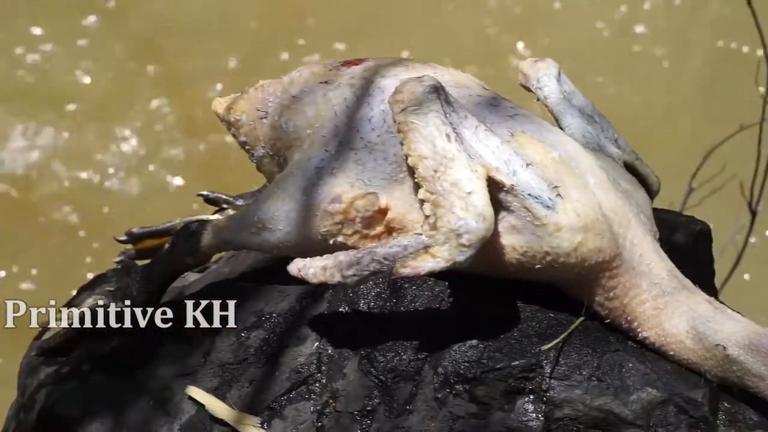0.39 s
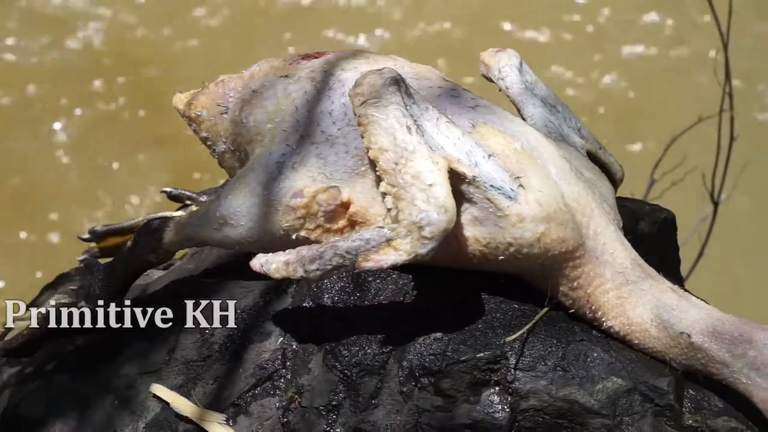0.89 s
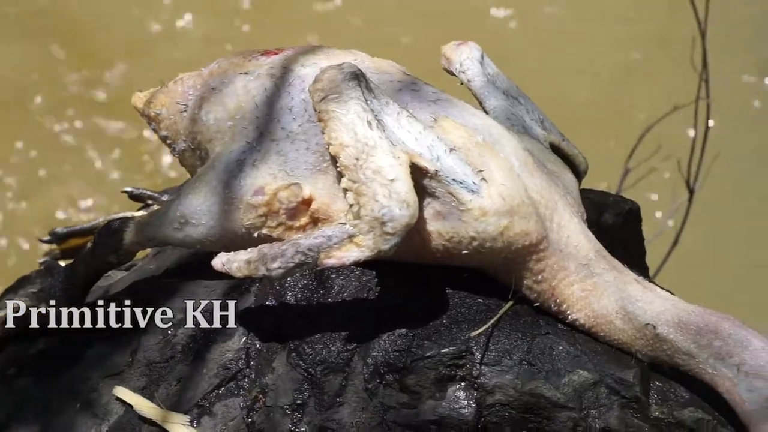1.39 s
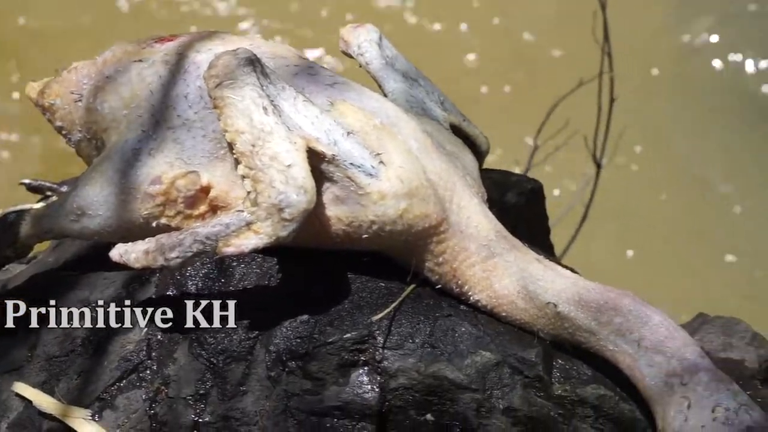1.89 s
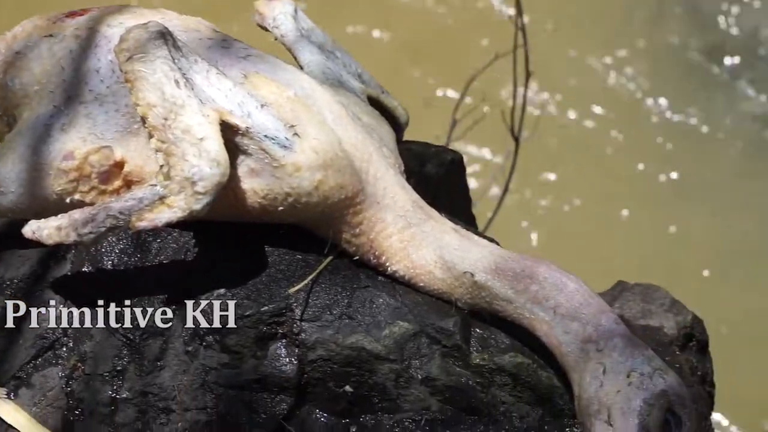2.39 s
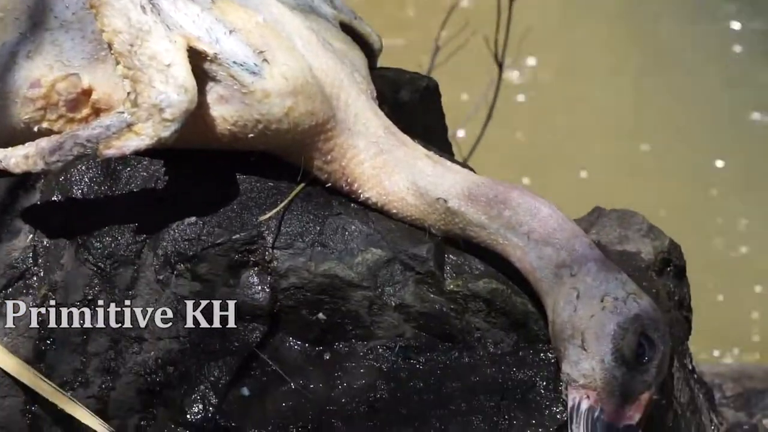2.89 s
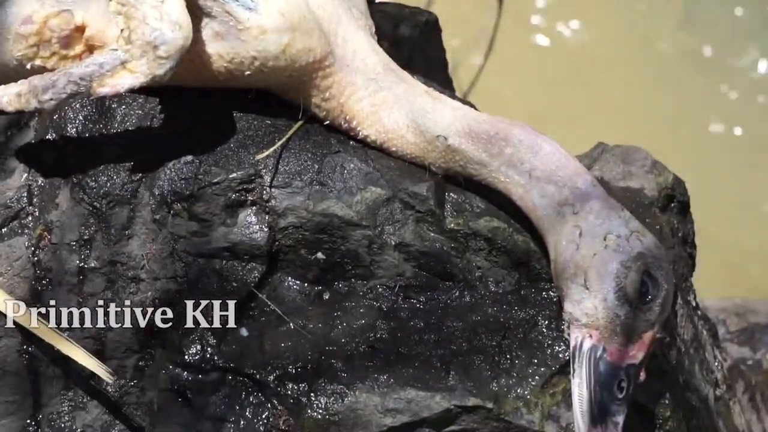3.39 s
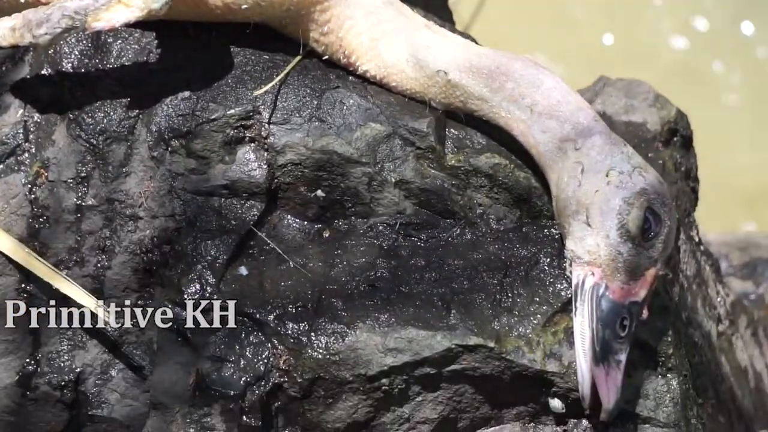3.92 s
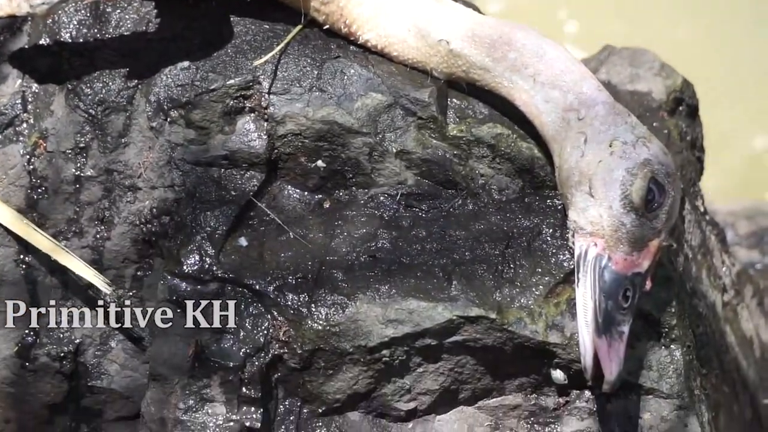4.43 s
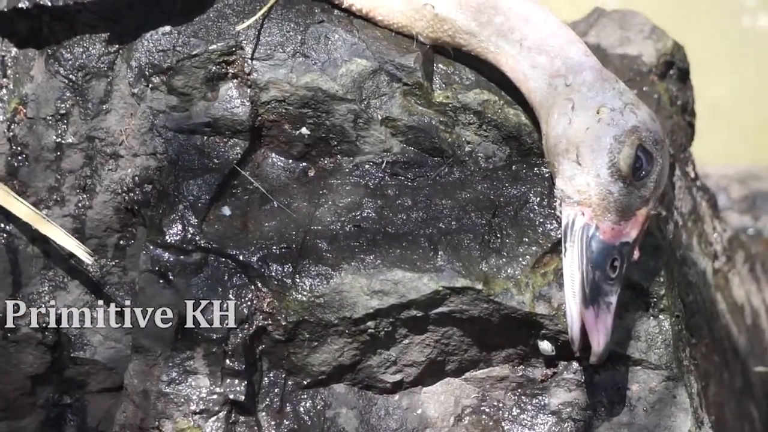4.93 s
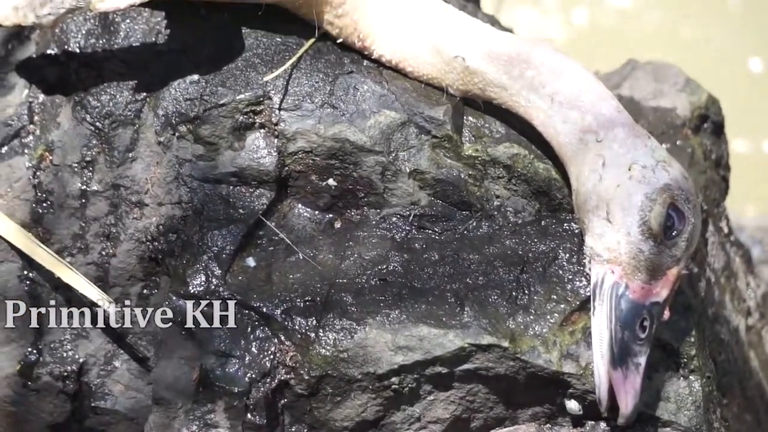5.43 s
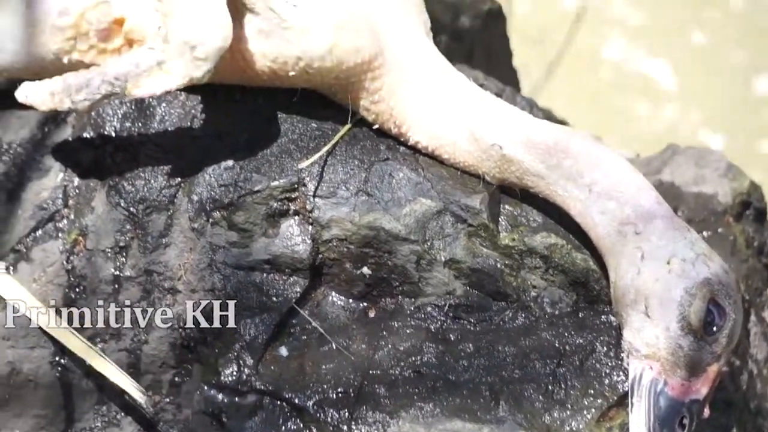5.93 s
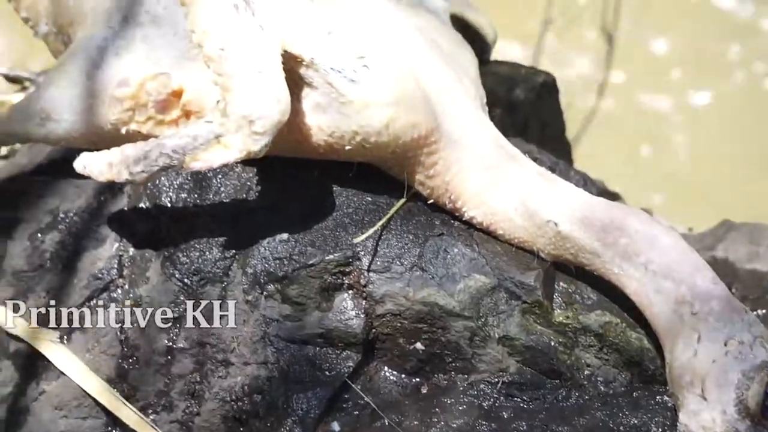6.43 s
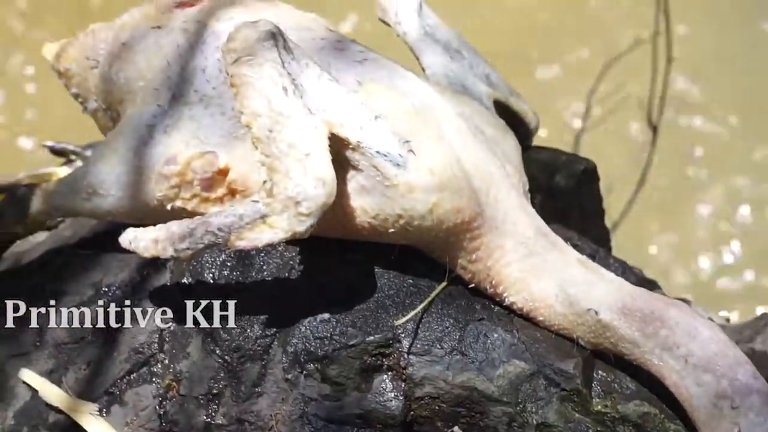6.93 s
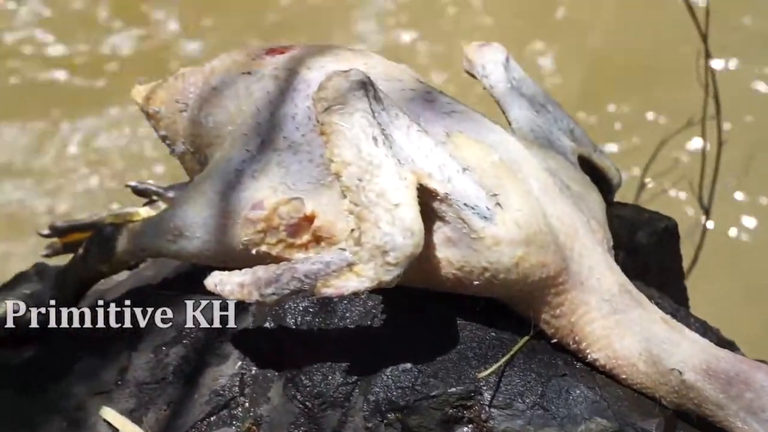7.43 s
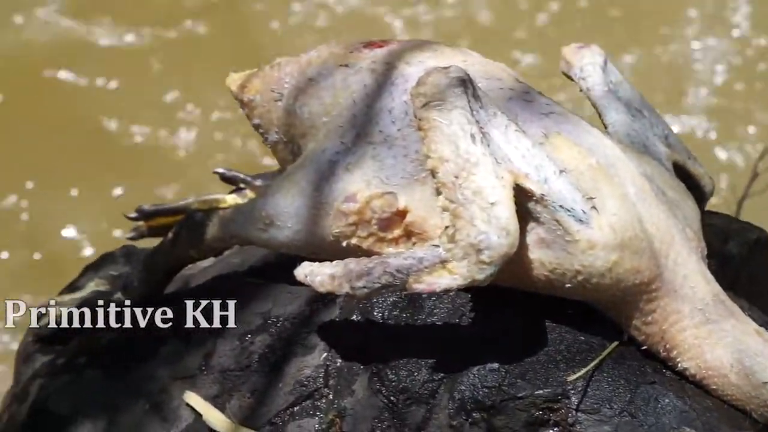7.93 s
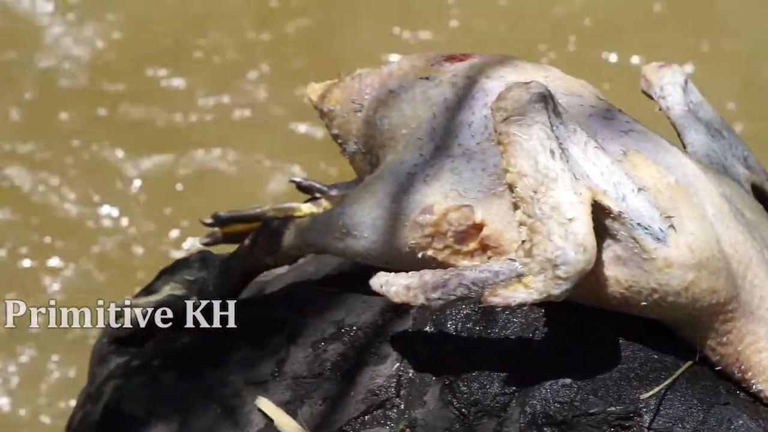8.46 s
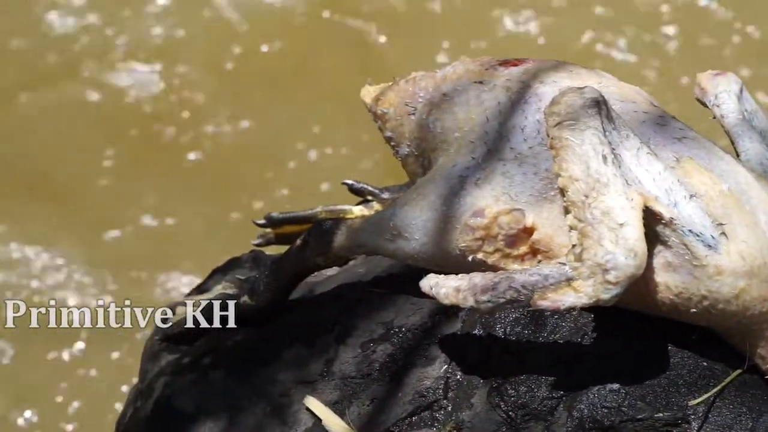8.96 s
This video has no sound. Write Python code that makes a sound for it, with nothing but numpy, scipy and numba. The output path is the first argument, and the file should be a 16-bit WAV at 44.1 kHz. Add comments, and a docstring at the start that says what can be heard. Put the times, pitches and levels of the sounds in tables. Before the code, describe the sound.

Outdoor white water, close to a rock at the stream's edge, picked up by a small stereo microphone pair. Continuous mid-heavy rush, little deep bass, soft dull treble, with wet bubbles ringing briefly and rising in pitch. One hard dropout of pure silence from about 1.9 to 2.9 seconds; afterwards the rush returns instantly with more frequent round plops and continues without fading.

```python
"""A patchy roar of far white water comes first: a fast stream over rocks, heard from the bank by a small
microphone pair. The roar is noise surging in overlapping bands. Near the rock, air bubbles and spray drops
ring briefly, rising in pitch: three crowds of decaying sines, shaped in tone together with the roar.
Single large bubbles plop close by. The sound drops out abruptly for one second."""
import sys
import numpy as np
from scipy import signal
from scipy.fft import rfft, irfft, next_fast_len
from scipy.io import wavfile
from numba import njit

SR = 44100
rng = np.random.default_rng(int(sys.argv[2]) if len(sys.argv) > 2 else 0)


def pcm_store(signal):
    """Save signal as 16-bit PCM."""
    levels = np.round(np.clip(np.atleast_2d(signal), -1, 1) * 32767)
    wavfile.write(sys.argv[1], SR, levels.astype(np.int16).T)


def volts_from_db(level):
    """Convert decibel levels to linear amplitude ratios."""
    exponent = np.asarray(level, float) / 20
    return 10 ** exponent


N = 400428   # length in samples

# the stream's flow, before the slow wander: time_s, body_level_db, treble_level_db
STREAM_FLOW = [(0.0, -21, -25.5), (0.55, -19, -25), (1.1, -19.5, -24.5), (1.55, -20, -25),
               (1.89, -19, -24.5), (2.9, -21, -26), (3.03, -19, -26.5), (3.15, -23, -27.5),
               (3.3, -21, -25.3), (3.6, -18.5, -25), (3.82, -20.5, -24.5), (4.25, -19.8, -24),
               (4.45, -18, -23), (4.9, -18.5, -22.5), (5.17, -19.5, -24.5), (5.3, -18.5, -22),
               (6.0, -19, -22.5), (6.7, -19, -23.5), (7.19, -17.5, -23.5), (7.35, -18.5, -23.5),
               (8.05, -19.5, -23.5), (8.35, -18.5, -23.5), (9.08, -19, -23.5)]
# bass of the stream against its body, before the slow wander: time_s, bass_level_db
STREAM_BASS = [(0.0, -23), (1.2, -21), (1.89, -23.5), (2.9, -17), (3.3, -27), (3.85, -29), (4.4, -22.5),
               (5.3, -25.5), (6.1, -24.5), (7.3, -24.5), (8.3, -24), (9.08, -25)]
# tone filter for all the water except the close plops: frequency_hz, gain_db
WATER_TONE = [(15, -72.5), (25, -39.5), (54, -49.5), (92, -39.5), (201, -11.5), (344, -4), (491, -3.5),
              (1260, -3.5), (1890, -5.5), (2320, -5), (5370, -11.5), (10100, -12.5), (11000, -11),
              (14200, -49), (22000, -120)]
# likeness of the roar at the two microphones: frequency_hz, correlation (-1 to 1, no unit)
ROAR_LIKENESS = [(60, .78), (110, 0.96), (190, 0.98), (350, 0.99), (630, 0.83), (1130, 0.53), (2020, 0.075),
                 (3630, -0.078), (6530, -0.45), (11700, -0.066)]
# left over right in the tone filter: frequency_hz, left_right_db
MICROPHONE_LEAN = [(60, 3.5), (130, -2), (270, 0.5), (580, 0.5), (1220, -0.5), (2600, -0.5), (5520, 1),
                   (11700, -1.5)]
# single bubbles close by: start_s, level_db (before the swell), starting_pitch_hz, left_right_db
CLOSE_PLOPS = [(0.359, -9, 967, -2), (0.753, -14, 524, 4), (0.801, -9, 465, 0), (1.096, -14.5, 3897, -2.5),
               (1.146, -12.5, 3130, -9.5), (1.665, -17, 2400, -1.5), (1.856, -12, 520, 2.0),
               (2.954, -9, 666, -1.0), (3.024, -11.5, 3370, -7.5), (3.034, -9.5, 429, -1.5),
               (3.335, -13, 4715, -3.5), (3.51, -10, 1150, 0), (3.645, -6.5, 1114, -1),
               (3.831, -11, 1604, -2.5), (3.835, -5.5, 1048, 0), (3.998, -12.5, 1088, -1),
               (4.471, -13, 345, 0), (4.473, -11.5, 930, -4.0), (4.549, -12, 1070, -1),
               (4.658, -12.5, 925, -3.0), (4.85, -8.5, 2155, -3), (5.017, -12, 790, 3.0),
               (5.072, -12, 1110, 0), (5.114, -9, 1260, 1.5), (5.278, -12, 2820, -4.5),
               (5.489, -11.5, 2000, -2.0), (5.745, -9, 411, 0), (6.452, -8, 1100, -1),
               (6.503, -13.5, 3040, -4), (6.568, -14, 382, -0.5), (6.901, -10, 810, -1),
               (7.019, -6, 845, 2), (7.09, -11, 774, 0), (7.239, -10.5, 1225, 0), (7.565, -12, 1200, 4),
               (8.114, -12.5, 681, 2.5), (8.706, -8, 1080, 2.0)]
# the silent second: start_s, end_s
SILENCE = (1.8955, 2.8958)


def rms_one(x):
    """Scale to unit rms."""
    return x / np.sqrt(np.mean(x ** 2) + 1e-20)


def drift(pole_hz):
    """Slow chance of unit rms: noise at every 40th sample through two equal one-pole low-passes."""
    pole = np.exp(-2 * np.pi * pole_hz * 40 / SR)
    noise = rng.standard_normal(N // 40 + 2002)
    slow = signal.lfilter([1], [1, -2 * pole, pole * pole], noise)[2000:]   # skip the filter's start
    return np.interp(np.arange(N) / 40, np.arange(len(slow)), rms_one(slow))


def at_hz(table, hz):
    """Read a table on a log-frequency axis."""
    table_hz, value = np.transpose(table)
    return np.interp(np.log(hz), np.log(table_hz), value)


def roar(shared_db, near_db, own_db):
    """Far white water: noise in overlapping bands, each surging with all, with its neighbours and alone."""
    size = next_fast_len(N)
    octave = np.log2(np.fft.rfftfreq(size, 1 / SR) + 1)
    white = rfft(rng.standard_normal((2, size)))
    out, surge, near = 0, drift(8.0), drift(21.0)
    for centre in np.arange(5, 14.5, .5):   # octaves above 1 Hz
        away = np.clip((octave - centre) * 2, -1, 1)
        mid, side = irfft(white * np.cos(away * np.pi / 2) ** 2, size)[:, :N]
        alike = np.clip(at_hz(ROAR_LIKENESS, 2 ** centre), -.99, .99)
        near = rms_one(near + 0.49 * drift(21.0))   # the surge changes gradually up the bands
        lumps_db = own_db * (1 + 170.0 / 2 ** centre)   # the bass is lumpier
        gain = volts_from_db(shared_db * surge + near_db * near + lumps_db * drift(25.0))
        out = out + gain * (np.sqrt(1 + alike) * mid + np.sqrt(1 - alike) * side * [[1], [-1]])
    return rms_one(out)


@njit
def ring_bubbles(out, start, hz, left, right, lag, cycles, onset, rise, sr):
    """Each bubble swells in about a cycle, dies away and glides up; lag (samples) shifts the right side."""
    for k in range(len(start)):
        for ear in range(2):
            size, late = (left[k], 0.) if ear == 0 else (right[k], lag[k])
            first = int(start[k] + late) + 1
            end = min(first + int(5 * cycles[k] * sr / hz[k]), out.shape[1])
            for i in range(max(first, 0), end):
                turns = (i - start[k] - late) * hz[k] / sr
                shape = (1 - np.exp(-turns / onset)) * np.exp(-turns / cycles[k])
                out[ear, i] += size * shape * np.sin(2 * np.pi * turns * (1 + rise[k] * turns))


def bubbles(count, low_hz, high_hz, cycles, uneven_db, clump_db, rise):
    """Bubbles of random size burst in clumps all across the stream, each ringing at its own pitch."""
    when, pitch, big, place, ring, glide = rng.random((count, 6)).T
    start = when * N
    hz = low_hz * (high_hz / low_hz) ** pitch
    clumps_db = clump_db * drift(9.0)[start.astype(int)]
    size = volts_from_db(-uneven_db * np.log(big + 0.008) + clumps_db) * hz
    size = size * np.sqrt(np.sin(np.pi * pitch))   # the largest and smallest bubbles are faint
    lean = volts_from_db(3.0 * (place - 1.0))
    right_lag = 15.6 * (place - .6)   # samples
    out = np.zeros((2, N))
    ring_bubbles(out, start, hz, size * lean, size / lean, right_lag, cycles * (.5 + ring), .7,
                 rise * glide, SR)
    return rms_one(out)


def coloured(x):
    """Filter the water to its tone, leaning as the microphones do; the stream lies a little to one side."""
    cutoff_hz, right_late_s = 11010, .000016
    size = next_fast_len(N + SR)
    hz = np.fft.rfftfreq(size, 1 / SR) + 1
    tone_db = at_hz(WATER_TONE, hz) + at_hz(MICROPHONE_LEAN, hz) * [[.5], [-.5]]
    shape = volts_from_db(tone_db) * (hz < cutoff_hz)
    shape = shape * np.exp(-2j * np.pi * hz * [[0], [right_late_s]])
    return irfft(rfft(x, size) * shape, size)[:, :N]


def low_part(x, corner_hz):
    """Keep what lies below the corner, without delay: a Butterworth low-pass run both ways."""
    return signal.sosfiltfilt(signal.butter(3, corner_hz, fs=SR, output="sos"), x)


def stream():
    """Roar, gurgles, froth and fizz share one tone; the flow sets body, treble and bass, the side wanders."""
    s = np.arange(N) / SR
    flow_s, *columns = np.transpose(STREAM_FLOW)
    level_db, treble_db = [np.interp(s, flow_s, column) for column in columns]
    bass_db = np.interp(s, *np.transpose(STREAM_BASS))
    far = roar(shared_db=0.37, near_db=0.5, own_db=0.82)
    gurgles = bubbles(count=1300, low_hz=219.7, high_hz=2396, cycles=10.3,
                      uneven_db=2.5, clump_db=1.5, rise=.008)
    froth = bubbles(count=5000, low_hz=200.0, high_hz=3175, cycles=5.1,
                    uneven_db=2.5, clump_db=1.0, rise=.025)
    fizz = bubbles(count=20000, low_hz=1775, high_hz=13110, cycles=4.0,
                   uneven_db=2.5, clump_db=2.1, rise=.015)
    water = coloured(far + volts_from_db(-18.5) * gurgles + volts_from_db(-15.5) * froth + volts_from_db(-9.5) * fizz)
    rumble = low_part(water, 220)
    dull = low_part(water, 3000)
    # each wander is an rms in dB
    body = volts_from_db(0.45 * drift(4.0)) * rms_one(dull - rumble)
    body = body + volts_from_db(bass_db + 2 * drift(5.0)) * rms_one(rumble)
    treble = rms_one(water - dull)
    left_right_db = 0.8 + 0.32 * drift(3.0)
    return volts_from_db(left_right_db * [[.5], [-.5]]) * (volts_from_db(level_db) * body + volts_from_db(treble_db) * treble)


def plops():
    """Single large bubbles close by: each a swelling, dying sine that glides up slightly."""
    start_s, level_db, pitch_hz, left_right_db = np.transpose(CLOSE_PLOPS)
    left, right = volts_from_db(level_db + left_right_db / 2), volts_from_db(level_db - left_right_db / 2)
    out, same = np.zeros((2, N)), np.ones(len(start_s))
    ring_bubbles(out, start_s * SR, pitch_hz, left, right, 0 * same, 4.95 * same, 1.2, 0.0097 * same, SR)
    return out


def scene():
    """The whole stream with the plops close by."""
    return stream() + plops()


def band_limit(x):
    """A steep low-pass at the top of the band."""
    return signal.sosfilt(signal.butter(12, 12340, fs=SR, output="sos"), x)


def record(dry):
    """The sound drops out abruptly for a second, by a gain that falls and returns in 0.1 ms."""
    s = np.arange(N) / SR
    silent_from_s, silent_to_s = SILENCE
    heard = np.clip(np.maximum(silent_from_s - s, s - silent_to_s) / 0.0001, 0, 1)
    return band_limit(dry * heard)


dry = scene()
out = record(dry)
pcm_store(out)
```